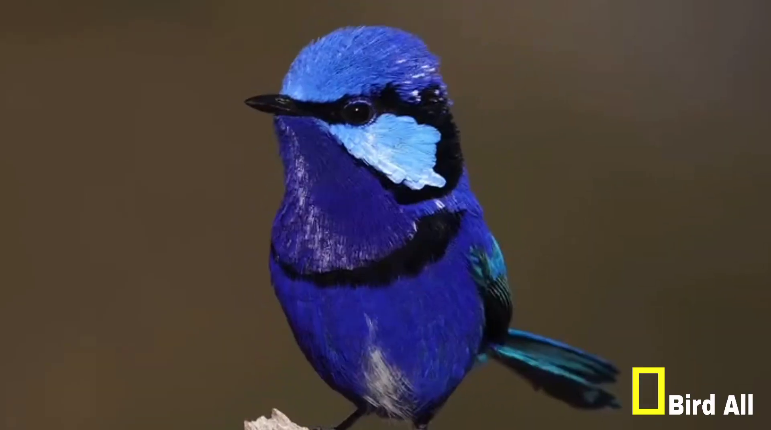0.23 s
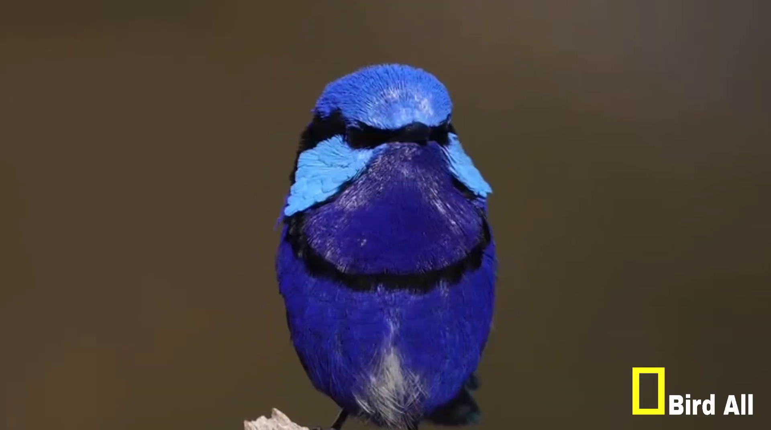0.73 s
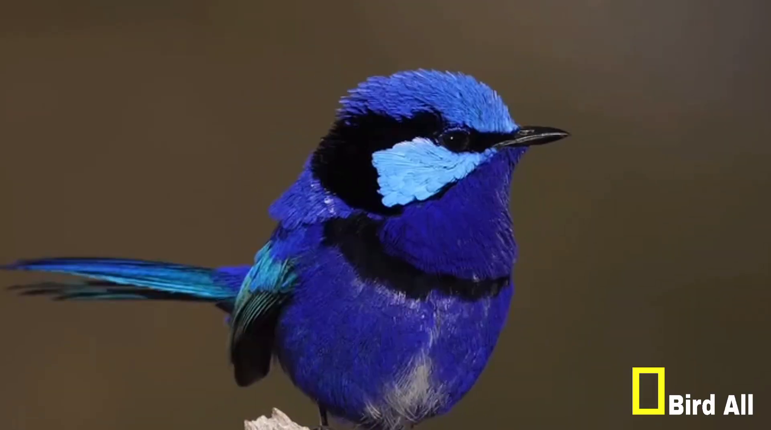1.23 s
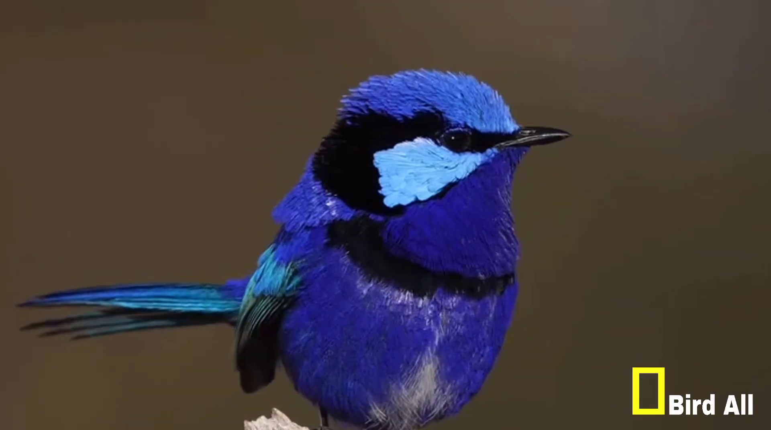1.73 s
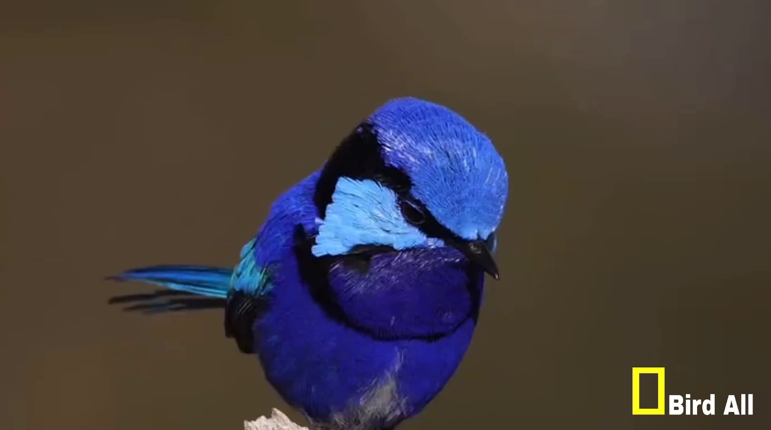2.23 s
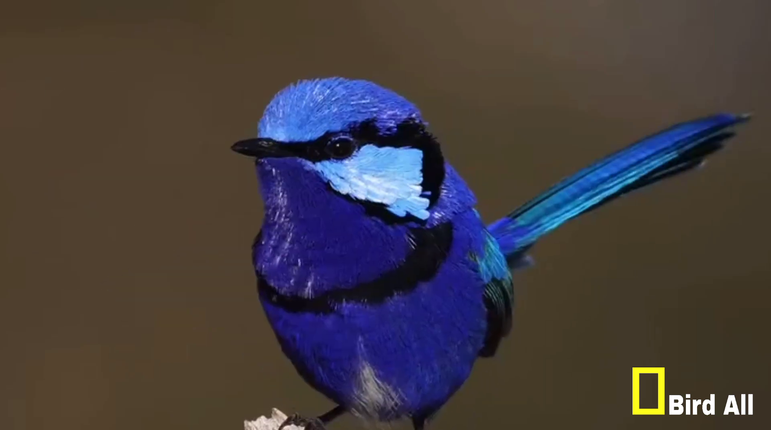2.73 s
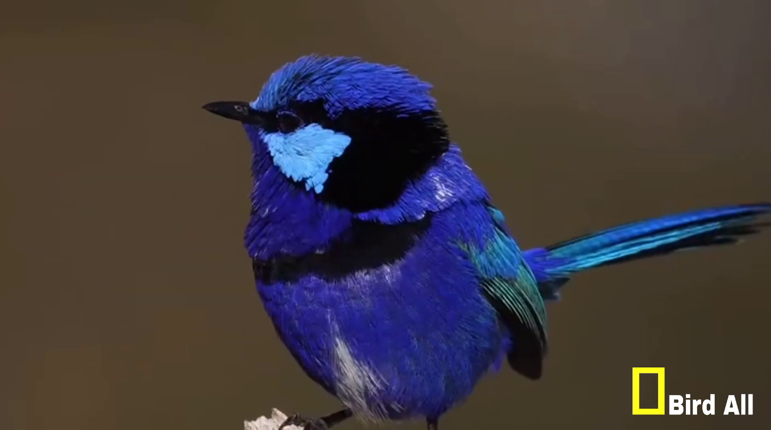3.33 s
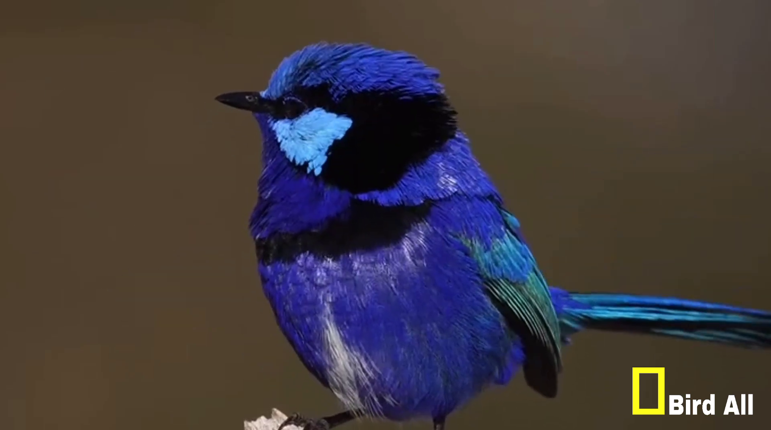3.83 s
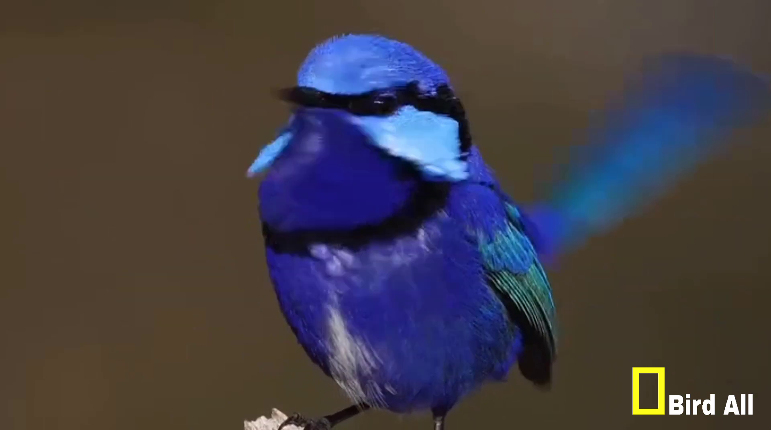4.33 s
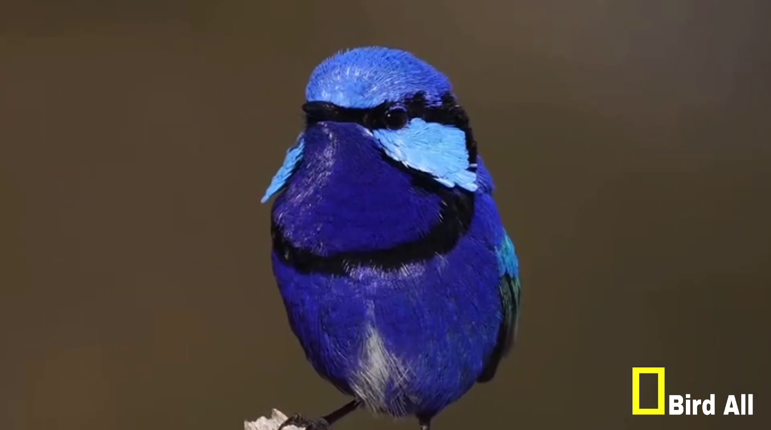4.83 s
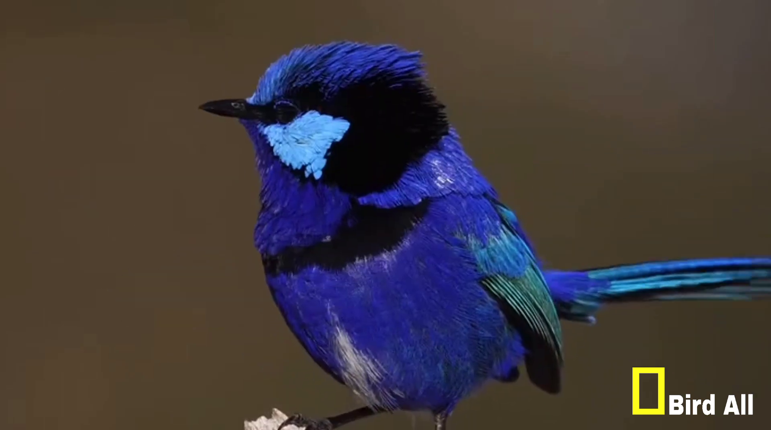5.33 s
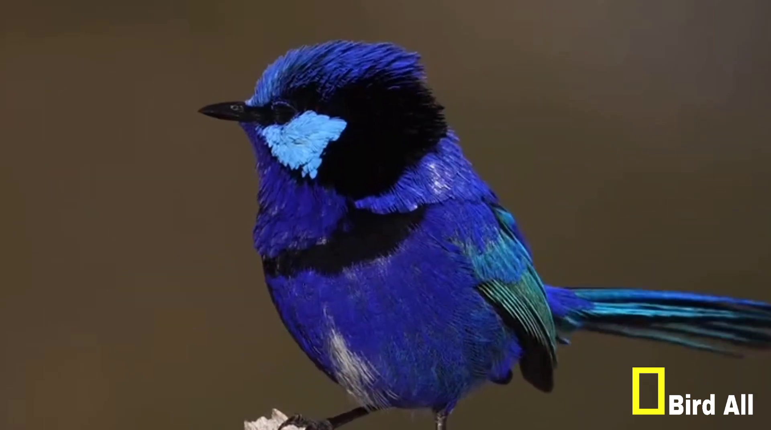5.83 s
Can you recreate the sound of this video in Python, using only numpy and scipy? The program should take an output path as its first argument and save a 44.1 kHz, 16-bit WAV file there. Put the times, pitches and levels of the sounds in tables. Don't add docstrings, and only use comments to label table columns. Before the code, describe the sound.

Quiet woodland in wide stereo, with a barely audible leaf hush and dense echo already ringing from earlier song. At 0.1 s a very high whistle slides gently down, then a strong, lower held whistle at 0.4 leads into loud, quick upward flicks from 0.6 to 0.9, a crest, firm drops and a last wide flick near 1.2. From 1.5 to 2.1 a nearer singer gives five steep falling sweeps, evenly spaced and growing louder. Two arching, falling whistles follow at 2.3 and 2.5, then a fast double trill from 2.8 to 3.3, over soft distant rising calls. Around 3.4 to 3.8 come a rising and a level whistle with harsh distant churrs. From 4.0 to 4.8 five slower hooked falls descend. After 5.0 a clear whistle, tiny chips and progressively softer drooping whistles end the passage, echoes lingering.

```python
import sys
import numpy as np
from scipy import signal
from scipy.fft import rfft, irfft, next_fast_len
from scipy.io import wavfile
from scipy.ndimage import uniform_filter1d

SR = 44100
rng = np.random.default_rng(int(sys.argv[2]) if len(sys.argv) > 2 else 0)


def to_linear_factor(level_db):
    exponent = np.asarray(level_db, float) / 20
    return 10 ** exponent


def master_out(mix):
    frames = np.transpose(np.atleast_2d(mix))
    ceiling = np.clip(frames, -1, 1)
    pcm = np.round(ceiling * 32767).astype(np.int16)
    wavfile.write(sys.argv[1], SR, pcm)


N = 267863
LEAD = SR // 2
GRACE_S = .008
TWIGS_S, TRUNKS_S, WOOD_S = .06, .5, 1.5
HUSH_DB = -70

ARCH_NOTES = [
    (2.312, 0.15, 6933, 5790, -27.5),
    (2.513, 0.137, 7190, 5910, -32.5),
    (5.03, 0.11, 7510, 7160, -34.5),
    (5.505, 0.11, 7395, 6700, -40.5),
]
DROOP_NOTES = [
    (5.717, 0.11, 7650, 6450, -40.5),
    (5.9, 0.125, 7670, 6510, -40),
]
LIFT_NOTES = [
    (3.372, 0.138, 6300, 7440, -29),
    (3.718, 0.098, 6243, 6286, -30),
]
SCOOP_NOTES = [
    (0.725, 0.105, 7350, 6930, -42.5),
    (2.702, 0.06, 4830, 4540, -32.5),
    (5.19, 0.078, 4380, 3870, -40),
    (5.762, 0.053, 6620, 4890, -51),
    (5.357, 0.042, 6900, 5500, -30.5),
    (3.95, 0.03, 8360, 7360, -42),
]
CHIP_NOTES = [
    (1.03, 0.045, 7860, 5590, -39.5),
    (1.375, 0.027, 7220, 6330, -43),
    (1.43, 0.027, 4940, 3680, -40),
    (3.565, 0.03, 5280, 3590, -36),
    (5.085, 0.027, 5610, 5690, -42.5),
    (5.275, 0.024, 5390, 3530, -40),
    (5.345, 0.016, 6300, 6840, -35.5),
    (5.395, 0.04, 5485, 6010, -33.5),
    (5.43, 0.012, 5100, 5130, -49),
    (5.478, 0.018, 4750, 4630, -51),
]
SWEEP_SYLLABLE = [
    (1.515, .078, 7920, 3760, -37.5),
]
HOOK_SYLLABLE = [
    (4.022, .093, 8154, 4230, -35),
]
UPPER_SYLLABLE = [
    (2.836, .042, 3617, 4140, -31),
]
LOWER_SYLLABLE = [
    (2.919, .026, 2850, 2645, -38),
]
HELD_NOTES = [
    (0.388, 0.222, 4636, 4500, -22.5),
]
FLICK_NOTES = [
    (0.605, 0.06, 4560, 5107, -18.5),
    (0.71, 0.049, 4480, 5635, -17),
    (0.805, 0.06, 4497, 5270, -19.5),
    (1.17, 0.05, 4396, 6150, -25),
]
CREST_NOTES = [
    (0.9, 0.045, 5470, 6240, -26),
    (0.945, 0.055, 6210, 5555, -27.5),
]
DROP_NOTES = [
    (1.047, 0.075, 4353, 3514, -21),
    (1.225, 0.055, 5050, 3720, -30.5),
]
SLIDE_NOTES = [
    (.11, .25, 8550, 7580, -24),
]
EARLIER_NOTES = [
    (-.3, .32, 4650, 4640, -31),
    (-.3, .25, 2650, 2680, -46.5),
    (-.1, 0.13, 1443, 1456, -60),
    (-.1, .13, 6520, 6496, -60),
]
FAR_NOTES = [(0.785, 0.025, 3360, 3820, -46), (0.915, 0.035, 3676, 3610, -41),
             (0.955, 0.025, 3646, 3490, -46), (2.205, 0.05, 2610, 2680, -52.5),
             (2.55, 0.025, 5790, 5180, -51), (2.99, 0.015, 5230, 5000, -55),
             (3.055, 0.015, 5900, 5200, -53), (3.48, 0.04, 5680, 5440, -50), (3.62, 0.06, 3090, 3020, -49),
             (3.635, 0.012, 6990, 7690, -35), (3.725, 0.025, 7450, 7800, -51.5),
             (0.25, 0.25, 2700, 2540, -57.5), (4.9, 0.08, 2690, 2660, -60.5), (5.14, 0.06, 3600, 3600, -61),
             (5.112, 0.013, 6000, 5100, -57), (5.07, 0.015, 6300, 5660, -55),
             (2.76, 0.022, 5760, 4800, -46), (2.885, 0.015, 5360, 4500, -46.5),
             (1.8, 0.06, 4330, 4290, -50), (2.04, 0.07, 4410, 4300, -46), (2.16, 0.03, 6400, 7200, -54.5),
             (1.34, 0.02, 7750, 8100, -52), (2.35, 0.06, 5100, 5600, -51)]
RISE_SYLLABLE = [
    (2.2, .06, 3068, 4900, -45),
]
BUZZ_NOTES = [(3.325, 0.075, 2740, 3230, -38.5), (3.47, 0.035, 4850, 4940, -39),
              (3.505, 0.04, 4700, 3300, -35), (3.545, 0.025, 3100, 3120, -34.5),
              (3.81, 0.19, 2980, 3750, -47.5), (3.83, 0.19, 3500, 4400, -44), (3.82, 0.06, 2600, 2900, -48),
              (4.04, 0.035, 4500, 3820, -41.5), (4.1, 0.03, 5400, 5770, -45.5),
              (4.12, 0.08, 3700, 3595, -52.5), (4.15, 0.05, 4830, 4400, -56.5),
              (2.42, 0.018, 7300, 7440, -44), (3.15, 0.18, 4550, 4700, -52.5),
              (0.77, 0.06, 3000, 3500, -49.5), (3.34, 0.06, 2400, 2600, -51), (1.09, 0.05, 3450, 3000, -45),
              (0.85, 0.2, 3250, 3100, -53), (3.87, 0.1, 3300, 4700, -48), (2.33, 0.09, 5000, 5500, -50)]

# [f/Hz, t60/s]
TWIGS_DECAY = [(2500, 0.039), (8500, 0.016)]
# [f/Hz, t60/s]
TRUNKS_DECAY = [(2500, 0.48), (5000, 0.36), (8500, 0.25)]
# [f/Hz, t60/s]
WOOD_DECAY = [(2500, 2.67), (5000, 2.28), (8500, 2.1)]
# [f/Hz, level/dB per Hz]
HUSH_COLOUR = [(100, -41.5), (300, -27.5), (500, -22.5), (700, -10), (1000, -1), (2000, -0.5), (3500, 2),
               (6000, 0.5), (9000, -0.5), (12500, -3), (14000, -7.5), (15500, -8), (17500, -26)]
# [f/Hz, likeness from -1 to 1]
HUSH_LIKENESS = [(300, 0.036), (1200, 0.14), (2500, 0.16), (9000, -0.51)]
# [f/Hz, level below neighbour/dB]
MASKED_DEPTH = [(2000, 70), (3500, 46), (7500, 41), (8600, 28), (10000, 31), (13000, 30)]


def near_bird():
    sweeps = repeat(SWEEP_SYLLABLE, period_s=.132, growth_db=0.6, count=5)
    hooks = repeat(HOOK_SYLLABLE, period_s=.174, growth_db=-0.44, count=5)
    notes = glide(ARCH_NOTES, linger=3.5, attack_db=-9, swell_db=-2.5, release_db=-6,
                  grace_hz=640, arch_hz=260, edge=.12)
    notes += glide(DROOP_NOTES, linger=3.9, attack_db=-11, swell_db=5.5, release_db=0.0)
    notes += glide(LIFT_NOTES, settle=2.6, attack_db=-13, swell_db=-13.5, release_db=-3,
                   grace_hz=-350, edge=.15)
    notes += glide(SCOOP_NOTES, settle=2.6, attack_db=-3.5, swell_db=-1.5, release_db=-4)
    notes += glide(CHIP_NOTES, linger=1.3, settle=1.4, attack_db=-4.5, release_db=-2.5)
    notes += glide(sweeps, linger=2.2, settle=1.6, attack_db=-5.5, swell_db=3.0, release_db=-6, edge=0.42)
    notes += glide(hooks, linger=3.4, settle=2.2, attack_db=-8, swell_db=11, release_db=-5,
                   arch_hz=298.8, edge=.35)
    song = to_linear_factor(2.0) * sing(notes, [(3 / 2, -46)], waver=.0026)
    return place(song, direct_db=-1, pan_db=-9.5, trunks_db=-5.5, wood_db=-10.5, twigs_db=-4.5)


def trilling_bird():
    upper = repeat(UPPER_SYLLABLE, period_s=.0925, growth_db=.1, count=6)
    lower = repeat(LOWER_SYLLABLE, period_s=.0632, growth_db=-0.27, count=6)
    notes = glide(upper, linger=1.3, attack_db=-5.5, swell_db=0.5, release_db=-8)
    notes += glide(lower, attack_db=0.0, swell_db=-3.5, release_db=-2.5)
    song = to_linear_factor(-2.5) * sing(notes, [(0.77, -55)], waver=.0022)
    return place(song, direct_db=1.0, pan_db=-9.5, trunks_db=-6, wood_db=-5, twigs_db=-10)


def loud_bird():
    notes = glide(HELD_NOTES, attack_db=2.5, swell_db=2.0, release_db=-2.5)
    notes += glide(EARLIER_NOTES, attack_db=-1.5, swell_db=10.5, release_db=-1.0)
    notes += glide(FLICK_NOTES, linger=3.5, settle=1.3, attack_db=-8.5, swell_db=-2, release_db=-8)
    notes += glide(CREST_NOTES, linger=1.2, settle=1.2, attack_db=-5.5, swell_db=3, release_db=-1.5)
    notes += glide(DROP_NOTES, linger=2.8, attack_db=4, swell_db=-3, release_db=-0.5)
    song = sing(notes, [(2, -37), (3, -38.5)], waver=.0045)
    slide = glide(SLIDE_NOTES, linger=3.5, settle=2.2, attack_db=-12, swell_db=-0.5, release_db=-8)
    song += sing(slide, [(3 / 2, -36)])
    return place(song, direct_db=-6.5, pan_db=-2.5, trunks_db=-0.66, wood_db=-8.5, twigs_db=-2)


def far_birds():
    rises = repeat(RISE_SYLLABLE, period_s=.196, growth_db=1.8, count=4)
    notes = glide(FAR_NOTES, attack_db=-1.0, release_db=-1.5)
    notes += glide(rises, linger=2.6, attack_db=2, swell_db=2.5, release_db=-.6)
    song = sing(notes, [(2.9, -26.5)], waver=0.016)
    return place(song, direct_db=-11.5, pan_db=-3.0, trunks_db=1.5, wood_db=0, twigs_db=-0.5)


def buzzing_bird():
    notes = glide(BUZZ_NOTES, settle=1.4, attack_db=3, release_db=-1.5)
    song = sing(notes, [], edge=0.0057, waver=.036)
    return place(song, direct_db=-12, pan_db=1.0, trunks_db=2.5, wood_db=-4.0, twigs_db=-6.5)


def repeat(syllable, period_s, growth_db, count):
    return [np.add(note, (k * period_s, 0, 0, 0, k * growth_db)) for k in range(count) for note in syllable]


def glide(rows, linger=1., settle=1., attack_db=-12., swell_db=0., release_db=-6.,
          grace_hz=0., arch_hz=0., edge=0.19):
    u = np.linspace(0, 1, 25)
    way = (1 - (1 - u) ** settle) ** linger
    attack = attack_db * np.clip(1 - u / edge, 0, 1)
    release = release_db * np.clip(1 - (1 - u) / edge, 0, 1)
    shape_db = attack + swell_db * (u - .5) + release
    paths = []
    for start, length, from_hz, to_hz, level_db in rows:
        grace = grace_hz * np.exp(-length * u / GRACE_S)
        hz = from_hz + (to_hz - from_hz) * way + grace + arch_hz * np.sin(np.pi * u)
        paths.append(np.transpose([start + length * u, hz, level_db + shape_db]))
    return paths


def sing(notes, overtones, edge=.005, waver=.004):
    out = np.zeros(N + 2 * LEAD)
    for note in notes:
        s, hz, db = np.transpose(note)
        t = np.arange(s.min(), s.max() + 1 / SR, 1 / SR)

        def smooth(v):
            return uniform_filter1d(np.interp(t, s, v), size=SR // 200, mode="nearest")

        unsteady = uniform_filter1d(rng.standard_normal(SR // 2), size=120)[:len(t)] * np.sqrt(120)
        pitch = smooth(hz) * (1 + waver * np.clip(unsteady, -2, 2))
        phase = 2 * np.pi * np.cumsum(pitch) / SR
        to_edge = np.minimum(t - t[0], t[-1] - t)
        gate = np.sin(np.pi / 2 * np.clip(to_edge / edge, 0, 1)) ** 2
        tone = np.sin(phase) + sum(to_linear_factor(level_db) * np.sin(k * phase) for k, level_db in overtones)
        first = max(LEAD + round(t[0] * SR), 0)
        out[first:][:len(t)] += to_linear_factor(smooth(db)) * gate * tone
    return out


def place(voice, direct_db, pan_db, trunks_db, wood_db, twigs_db=-4):
    echo = to_linear_factor(twigs_db) * tail(TWIGS_DECAY, rise=0.00072, length_s=TWIGS_S)
    echo += to_linear_factor(trunks_db) * tail(TRUNKS_DECAY, rise=0.004, length_s=TRUNKS_S)
    echo += to_linear_factor(wood_db) * tail(WOOD_DECAY, rise=0.036, length_s=WOOD_S)
    echo *= to_linear_factor([[pan_db / 4], [-pan_db / 4]])
    wet = signal.fftconvolve(voice[None], echo, axes=1)[:, :len(voice)]
    direct = voice * to_linear_factor([[direct_db + pan_db / 2], [direct_db - pan_db / 2]]) * [[1], [-1]]
    return (direct + wet)[:, LEAD:LEAD + N]


def tail(decay, rise, length_s, clumps_db=2.5):
    hz, t, z = signal.stft(rng.standard_normal((2, int(length_s * SR))), SR, nperseg=256)
    clumps = uniform_filter1d(rng.standard_normal(z.shape[1:]), size=12, axis=0)
    clumps = uniform_filter1d(clumps, size=4, axis=1)
    fade_db = -60 * t / along(decay, hz)[:, None]
    x = signal.istft(z * to_linear_factor(clumps_db * clumps / clumps.std() + fade_db), SR, nperseg=256)[1]
    x = pair(*x, -0.26) * (1 - np.exp(-np.arange(x.shape[1]) / SR / rise))
    return np.pad(x / np.linalg.norm(x[0]), ((0, 0), (0, 2 * SR)))[:, :int(WOOD_S * SR)]


def leaves():
    m = next_fast_len(N + 8192)
    hz = np.fft.rfftfreq(m, 1 / SR)
    z = pair(*rfft(rng.standard_normal((2, m))), along(HUSH_LIKENESS, hz)) * to_linear_factor(along(HUSH_COLOUR, hz))
    band = irfft(z.mean(0) * (hz > 700) * (hz < 2000), m)
    return irfft(z, m)[:, :N] * to_linear_factor(HUSH_DB) / band.std()


def along(points, hz):
    f, v = np.transpose(points)
    return np.interp(np.log(hz + 1), np.log(f + 1), v)


def pair(a, b, alike):
    turn = np.arccos(np.clip(alike, -1, 1)) / 2
    return np.array([np.cos(turn) * a + np.sin(turn) * b, np.cos(turn) * a - np.sin(turn) * b])


def scene():
    return near_bird() + loud_bird() + far_birds() + trilling_bird() + buzzing_bird() + leaves()


def unmasked(x, below_db, above_db, faint):
    hz, t, z = signal.stft(x, SR, nperseg=1024)
    power = uniform_filter1d((abs(z) ** 2).mean(0), size=9, axis=0)
    power = uniform_filter1d(power, size=3, axis=1)
    gap = (hz[:, None] - hz) / 1000
    slope_db = np.where(gap > 0, above_db * gap, -below_db * gap)
    spread = to_linear_factor(-2 * (along(MASKED_DEPTH, hz)[:, None] + slope_db))
    usual = (hz > 8500) * np.median(power, axis=1)
    heard = power > spread @ power + faint * usual[:, None]
    return signal.istft(z * heard, SR, nperseg=1024)[1][:, :N]


def top_cut(x):
    return signal.sosfilt(signal.butter(12, 15500, fs=SR, output="sos"), x)


def record(dry):
    thin = unmasked(dry, below_db=6, above_db=8, faint=.66)
    return top_cut(thin)


dry = scene()
out = record(dry)
master_out(out)
```